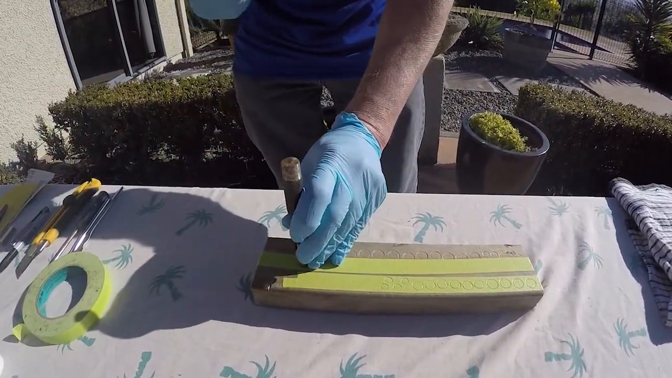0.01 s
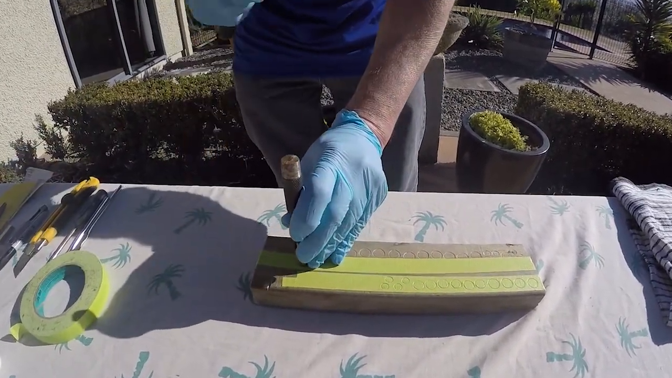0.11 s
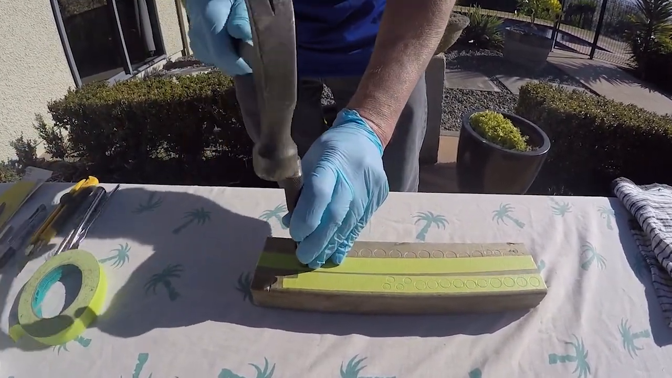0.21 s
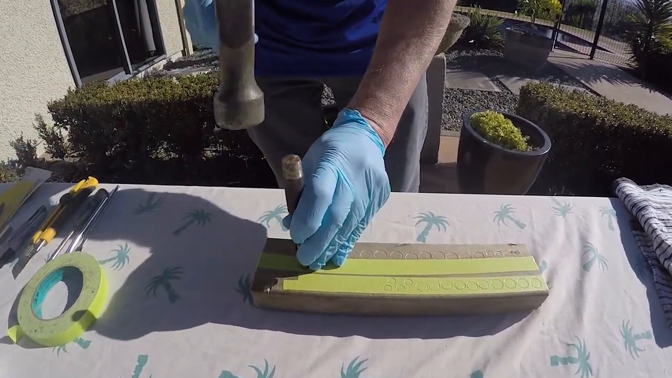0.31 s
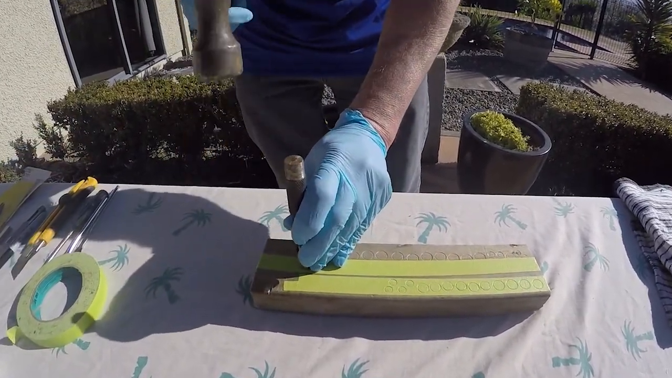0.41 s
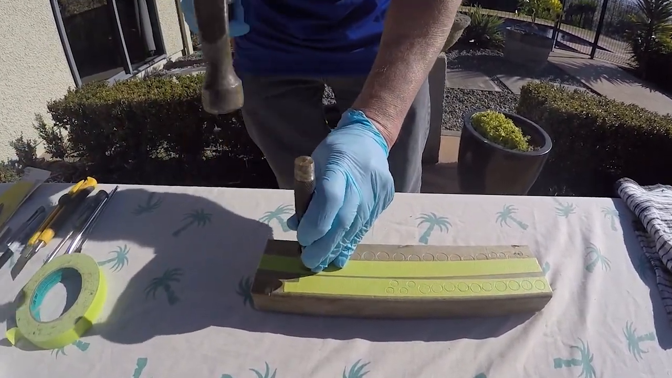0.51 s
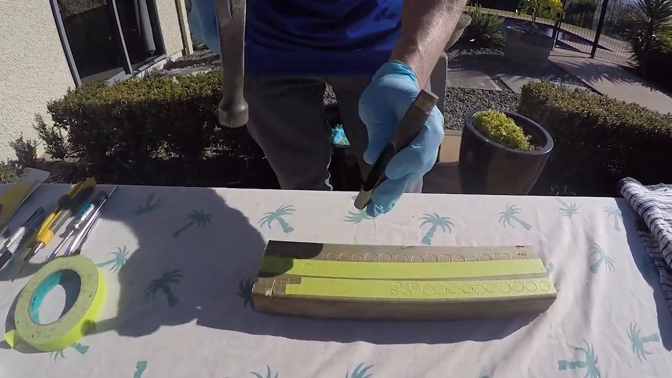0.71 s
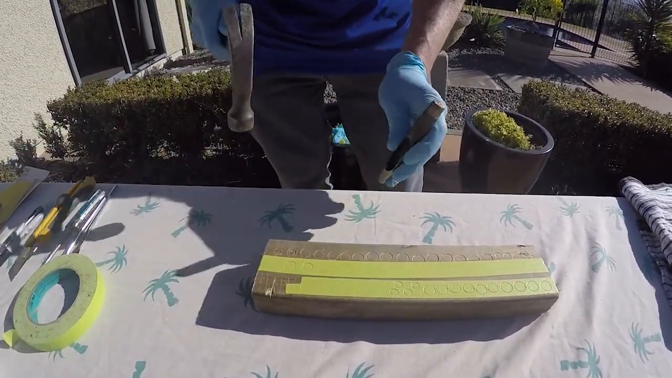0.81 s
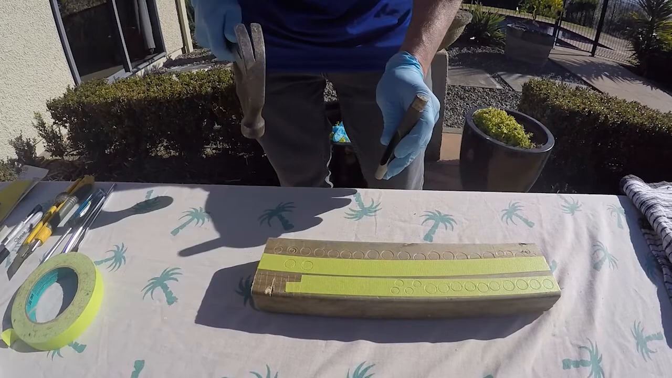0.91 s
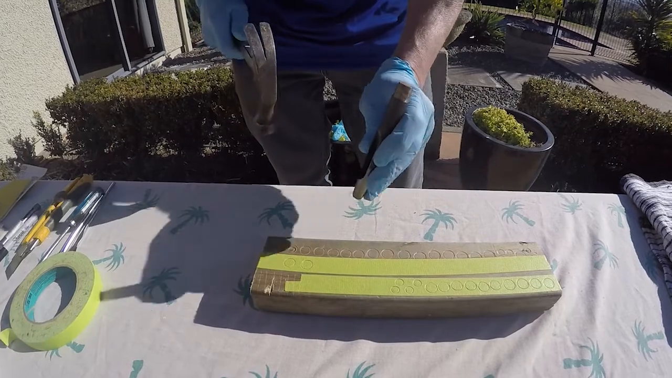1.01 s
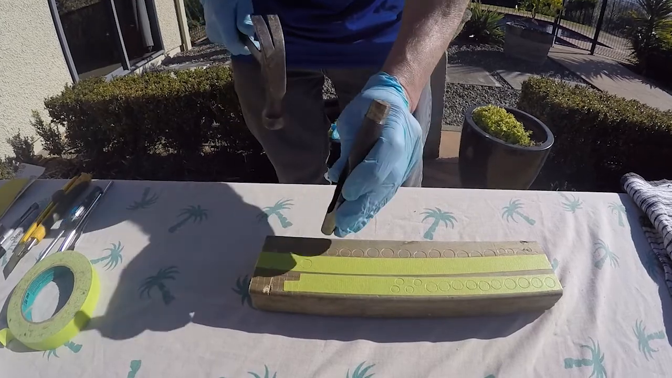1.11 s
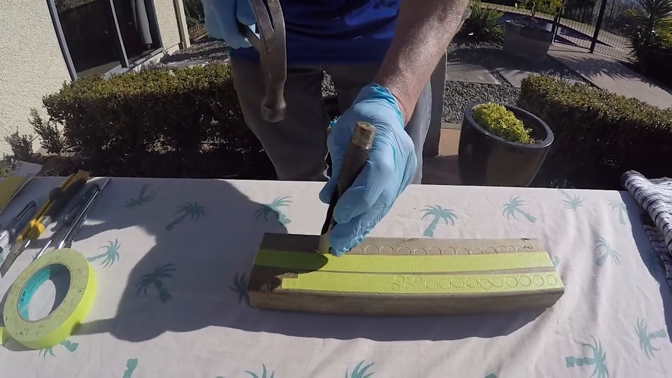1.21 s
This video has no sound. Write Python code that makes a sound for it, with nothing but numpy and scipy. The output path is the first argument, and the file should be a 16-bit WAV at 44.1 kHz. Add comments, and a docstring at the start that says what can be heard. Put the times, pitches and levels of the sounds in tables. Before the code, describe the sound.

After a brief stretch of quiet rumble and distant engine hum, a hammer strikes a hand-held steel punch once, loud and distorted; block and table thump, echoes scatter outdoors, and the background dips then slowly returns.

```python
"""Hammer blow on a steel punch

One blow on a punch standing on a wooden block on a light table, outdoors near walls, over a far engine's hum.
Shaped noise makes the crack, echoes, tail, ticks and outdoor air; fading sine waves make the clank,
block and table; steady sine waves make the hum. The blow overloads the recorder and is clipped.
The recorder's gain control ducks after the blow and creeps back."""
import sys
import numpy as np
from scipy import signal
from scipy.fft import rfft, irfft
from scipy.io import wavfile
from scipy.ndimage import uniform_filter1d, minimum_filter1d

SR = 44100
rng = np.random.default_rng(int(sys.argv[2]) if len(sys.argv) > 2 else 0)


def log_audio(samples):
    """Write samples as a 16-bit WAV file to the path given in sys.argv[1]."""
    # one column per channel
    frames = np.atleast_2d(samples).T
    # limit to full scale, then quantise
    limited = np.clip(frames, -1, 1)
    pcm = np.round(limited * 32767).astype(np.int16)
    wavfile.write(sys.argv[1], SR, pcm)


N = 57330
T = np.arange(N) / SR  # time of each sample in seconds
BLOW_S = 0.2127  # when the hammer lands


def undb(db):
    """Turn decibels into a gain."""
    return 10 ** (np.asarray(db) / 20)


def unit(x):
    """Scale to an rms (average strength) of 1."""
    return x / np.sqrt(np.mean(x ** 2))


def filtered_noise(gain):
    """White noise with each frequency scaled by its gain, then brought to rms 1."""
    spectrum = rfft(rng.standard_normal(N))
    return unit(irfft(spectrum * gain, N))


def coloured(points):
    """Noise whose spectrum joins (Hz, dB) points with straight lines over log frequency."""
    hz, db = np.array(points, float).T
    f = np.maximum(np.arange(N // 2 + 1) * SR / N, 1)  # at least 1 Hz, so the log exists
    return filtered_noise(undb(np.interp(np.log(f), np.log(hz), db)))


def band(hz, width):
    """Noise in a bell-shaped band; width Hz off its centre the amplitude is down to 1/e."""
    f = np.arange(N // 2 + 1) * SR / N
    return filtered_noise(np.exp(-((f - hz) / width) ** 2))


def fade(start, t60, rise):
    """Envelope: a quick rise, with a decay of 60 dB every t60 seconds."""
    t = np.maximum(T - start, 0)
    decay = np.exp(-np.log(1000) * t / t60)
    return (1 - np.exp(-t / rise)) * decay


def walk(rate):
    """Slow random wander: levels held for 1 / rate seconds, smoothed twice, at rms 1."""
    k = int(SR / rate)
    steps = np.repeat(rng.standard_normal(N // k + 1), k)
    smooth = uniform_filter1d(uniform_filter1d(steps, k), k)
    return unit(smooth[:N])


def ring(modes, start, rise):
    """Struck object: fading sine waves, all set off together."""
    total = 0
    for hz, db, t60 in modes:
        total = total + undb(db) * fade(start, t60, rise) * np.sin(2 * np.pi * hz * (T - start))
    return total


# Spectrum of the outdoor rumble and hiss. Each row: frequency in Hz, relative level in dB per Hz.
AIR_SPECTRUM = [(12, -37.5), (22, -10.5), (50, -8.5), (86, -8.5), (120, -13.5), (172, -21.5), (310, -31),
                (400, -34), (700, -35.5), (880, -34), (1330, -39.5), (2300, -46.5), (2900, -46.5),
                (8890, -59), (14500, -64.5), (16000, -88)]
AIR_DB, AIR_FLICKER_DB = -41.5, 0.87  # middle level, and rms flicker around it
# Background bands that swell unevenly. Each row: centre in Hz, width in Hz, middle level in dB.
SWELL_BANDS = [(914, 58, -69), (3060, 230, -75)]
SWELL_DB = 3.5  # rms swing of each band's level


def outdoor_air():
    """Flickering noise for rumble and hiss, plus narrow bands that swell unevenly."""
    air = undb(AIR_DB + AIR_FLICKER_DB * walk(33)) * coloured(AIR_SPECTRUM)
    swells = sum(undb(db + SWELL_DB * walk(14)) * band(hz, width) for hz, width, db in SWELL_BANDS)
    return air + swells


# Tones of the engine hum. Each row: multiple of HUM_HZ, level in dB before the swings below.
HUM_TONES = [(1, -38.5), (2, -35.5), (3, -47)]
# How the whole hum rises and falls. Each row: time in seconds, level change in dB.
HUM_LEVEL_CURVE = [(0, -4), (.08, 2.5), (.16, -6.5), (.6, -5), (.75, 0), (.9, -0.5), (1.0, -0.5), (1.15, 3),
                   (1.3, -0.5)]
HUM_HZ, HUM_DRIFT = 38.7, 0.0027  # middle pitch, and rms drift as a fraction of it
HUM_WAVER_DB = 0.5  # rms waver of each tone


def engine_hum():
    """A far engine: whole-number multiples of one drifting pitch, each wavering in level."""
    pitch = HUM_HZ * (1 + HUM_DRIFT * walk(2.1))
    turns = np.cumsum(pitch) / SR  # cycles so far
    hum = 0
    for k, db in HUM_TONES:
        hum = hum + undb(db + HUM_WAVER_DB * walk(6.5)) * np.cos(2 * np.pi * k * turns)
    return hum * undb(np.interp(T, *np.array(HUM_LEVEL_CURVE).T))


# Scattered tail of the blow.
# Each row: band centre in Hz, middle level in dB, time to fall 60 dB in seconds.
TAIL_BANDS = [(120, -19.5, .45), (208, -19.5, 0.41), (410, -13, 0.29), (797, -13, 0.31), (1450, -13, .29),
              (2800, -18.5, 0.37), (4670, -29.5, .37), (8500, -40, .41), (12000, -49.5, .5)]
TAIL_GRAIN_DB = 3.5  # rms roughness of each band's level


def scattered_tail():
    """Sound scattered around the place: grainy noise bands, each dying away at its own pace."""
    tail = 0
    for hz, db, t60 in TAIL_BANDS:
        grain = undb(db + TAIL_GRAIN_DB * walk(150))
        tail = tail + grain * fade(BLOW_S, t60, 0.0013) * band(hz, 0.4 * hz)
    return tail


# Echoes of the crack off walls. Each row: start in seconds, level in dB.
WALL_ECHOES = [(0.227, -23.5), (.268, -28.5), (.307, -30), (0.3466, -37), (.386, -52.5)]
# Spectrum of those echoes. Each row: frequency in Hz, relative level in dB per Hz.
ECHO_SPECTRUM = [(1000, -8), (3000, -1), (5500, -3), (9000, -6), (13000, -14), (16000, -34)]
ECHO_T60_S = .05
# a broad, dull echo from further off
FAR_S, FAR_DB, FAR_RISE_S, FAR_T60_S, FAR_HZ, FAR_WIDTH_HZ = .283, -18.5, 0.0086, 0.14, 890, 2700


def wall_echoes():
    """Walls throw the crack back as short noise bursts; a further echo swells in more softly."""
    bursts = sum(undb(db) * fade(s, ECHO_T60_S, .001) for s, db in WALL_ECHOES)
    far = undb(FAR_DB) * fade(FAR_S, FAR_T60_S, FAR_RISE_S) * band(FAR_HZ, FAR_WIDTH_HZ)
    return bursts * coloured(ECHO_SPECTRUM) + far


# Small things on the table ticking.
# Each row: start in seconds, level in dB, band centre in Hz, band width in Hz.
TABLE_TICKS = [(.2545, -9, 3600, 1300), (.266, -16, 3000, 1000), (.316, -39, 8800, 3000),
               (.5902, -42, 8500, 1800)]
TICK_T60_S = 0.0053


def ticks():
    """Small things on the table tick: very short bursts of bright noise."""
    return sum(undb(db) * fade(s, TICK_T60_S, 0.00014) * band(hz, width) for s, db, hz, width in TABLE_TICKS)


# Table top, pushed down by the blow.
# Each row: frequency in Hz, level in dB, time to fall 60 dB in seconds.
TABLE_TOP = [(92.4, -7, .15), (115.45, 6.5, .19), (135, 0, 0.059), (121.5, -16.5, 0.451),
             (185.7, -24.5, 1.1), (189.5, 0.5, 0.093), (242, -10, 0.08), (346, -41.5, 1.0)]
# Rocking legs. Each row: frequency in Hz, level in dB, time to fall 60 dB in seconds.
TABLE_LEGS = [(30, -7.5, 0.49), (36.5, -11, 0.56)]
TOP_LATE_S, LEGS_LATE_S = .0001, 0.0073  # delays after the blow
PUSH_S = 0.0035  # rise time of the push


def table():
    """The top booms and the legs rock a moment later; the minus signs are the downward push."""
    top = ring(TABLE_TOP, BLOW_S + TOP_LATE_S, PUSH_S)
    legs = ring(TABLE_LEGS, BLOW_S + LEGS_LATE_S, PUSH_S)
    return -top - legs


# Wooden block. Each row: frequency in Hz, level in dB, time to fall 60 dB in seconds.
BLOCK_TONES = [(325, -3, .07), (367, -4.5, .04), (509, -8.5, 0.11), (611, -9, .1), (780, -6.5, 0.02),
               (1032, -3.5, 0.067), (1245, -8.5, .07), (1506, -7.5, .09), (1674, -5, .05),
               (2284, -10.5, .05), (3210, -10, 0.07)]


def wooden_block():
    """The block knocks 1 ms after the blow: short-lived tones starting together."""
    return ring(BLOCK_TONES, BLOW_S + .001, 0.003)


# Steel punch, ringing roughly in the hand.
# Each row: band centre in Hz, level in dB, time to fall 60 dB in seconds, band width in Hz.
PUNCH_BANDS = [(3010, -32.5, 0.32, 250), (7950, -32.5, 0.38, 170), (11200, -48, .3, 180),
               (12800, -41.5, .17, 130)]


def steel_punch():
    """The hand-held punch rings roughly, so narrow noise bands stand in for pure tones."""
    return sum(undb(db) * fade(BLOW_S, t60, .0003) * band(hz, width) for hz, db, t60, width in PUNCH_BANDS)


# Spectrum of the crack. Each row: frequency in Hz, relative level in dB per Hz.
CRACK_SPECTRUM = [(300, -14), (1000, -10.5), (2200, -10), (2950, 2), (3600, -4.5), (5000, 4.5),
                  (6500, -10.5), (7900, -9.5), (9500, -18), (11500, -11.5), (14500, -16.5), (16000, -30)]
# Clank of steel on steel. Each row: frequency in Hz, level in dB, time to fall 60 dB in seconds.
CLANK_TONES = [(2887, 7, 0.028), (4016, -3.5, .02), (5028, 7.5, 0.016), (6084, 2.5, 0.008),
               (7890, -0.5, .02), (11370, -12.5, .02)]
CRACK_DB, CRACK_RISE_S, CRACK_T60_S = 7.5, .0004, 0.015


def crack_and_clank():
    """Hammer meets punch: a burst of noise for the crack, short steel tones for the clank."""
    crack = undb(CRACK_DB) * fade(BLOW_S, CRACK_T60_S, CRACK_RISE_S) * coloured(CRACK_SPECTRUM)
    return crack + ring(CLANK_TONES, BLOW_S, CRACK_RISE_S)


def scene():
    """Everything at the microphone, as one channel."""
    background = outdoor_air() + engine_hum()
    surroundings = scattered_tail() + wall_echoes()
    blow = table() + wooden_block() + steel_punch() + crack_and_clank()
    return (background + surroundings + ticks() + blow)[None]


DUCK_FROM_DB, DUCK_SHARE = -30, 0.34  # threshold, and dB turned down per dB above it
DUCK_ATTACK_S, HOLD_S = 0.011, 0.38
EXCESS_FALL_DB_PER_S = 44  # how fast the held excess may fall, before DUCK_SHARE
TOP_HZ = 15300


def record(dry):
    """Gain control ducks, holds and recovers steadily; what it misses is clipped; the top is cut."""
    power = uniform_filter1d(np.clip(dry, -1, 1) ** 2, size=221, origin=110)  # over the last 5 ms
    loud = 10 * np.log10(power + 1e-12)
    excess = np.maximum(loud - DUCK_FROM_DB, 0)
    # keep the largest excess of the last HOLD_S seconds
    hold = int(HOLD_S * SR) // 2
    held = -minimum_filter1d(-excess, 2 * hold + 1, origin=hold, mode="nearest")
    # then let it fall no faster than a steady slope
    slope = EXCESS_FALL_DB_PER_S * T
    held = np.maximum.accumulate(held + slope, axis=1) - slope
    # a smoother delays each change of gain
    a = 1 / (DUCK_ATTACK_S * SR)
    duck_db = -DUCK_SHARE * signal.lfilter([a], [1, a - 1], held)
    clipped = np.clip(dry * undb(duck_db), -1, 1)
    top_cut = signal.ellip(10, .3, 85, TOP_HZ, fs=SR, output="sos")
    return signal.sosfilt(top_cut, clipped)


dry = scene()
out = record(dry)
log_audio(out)
```